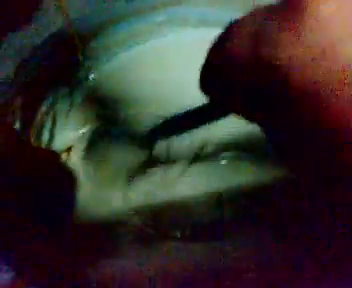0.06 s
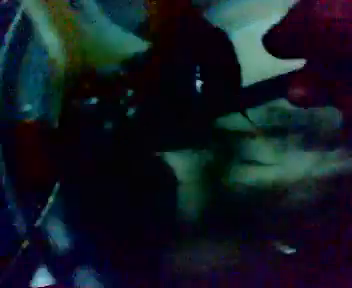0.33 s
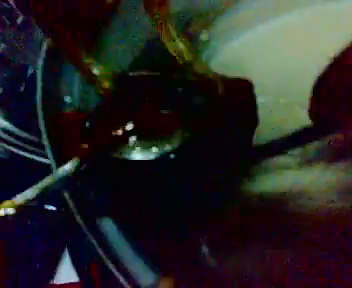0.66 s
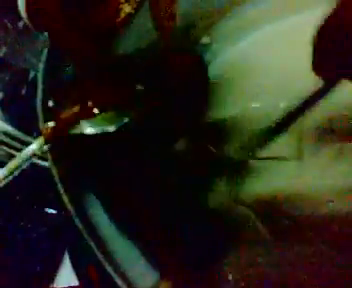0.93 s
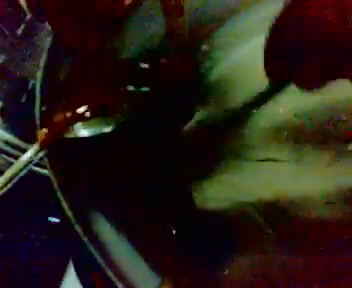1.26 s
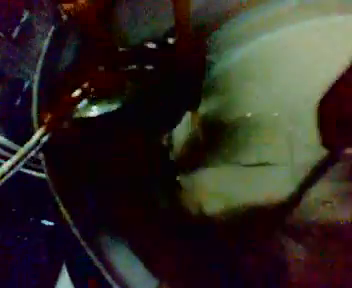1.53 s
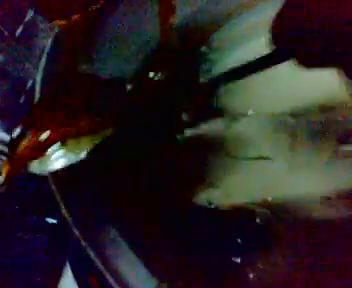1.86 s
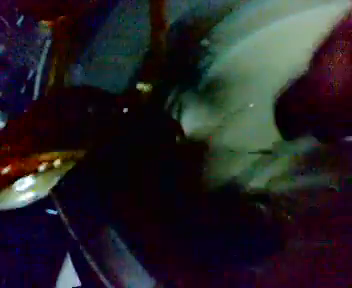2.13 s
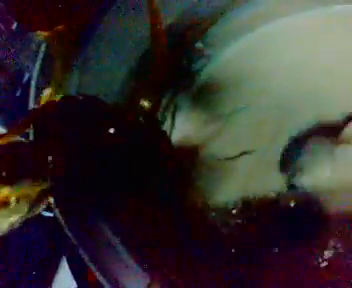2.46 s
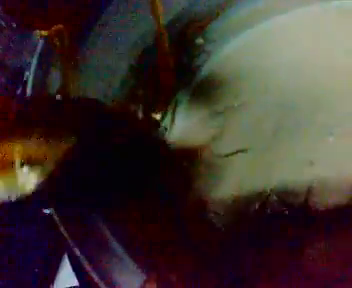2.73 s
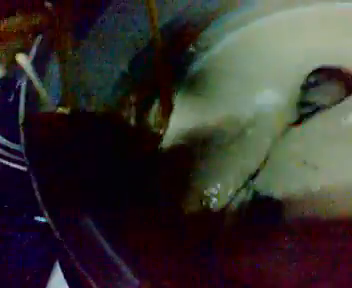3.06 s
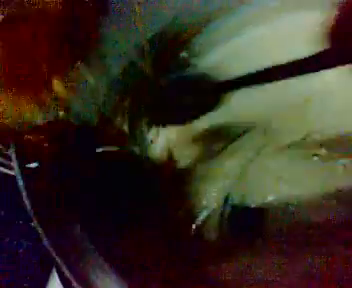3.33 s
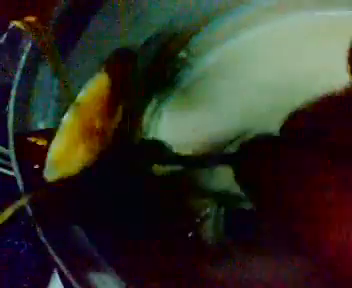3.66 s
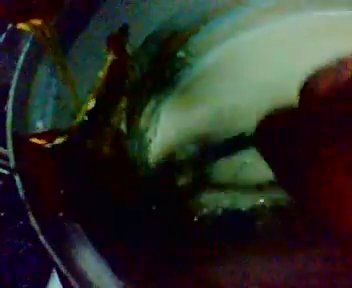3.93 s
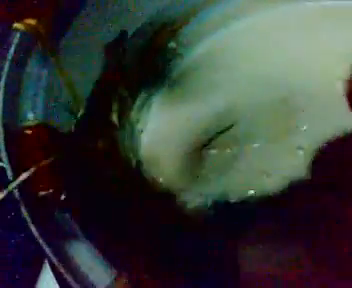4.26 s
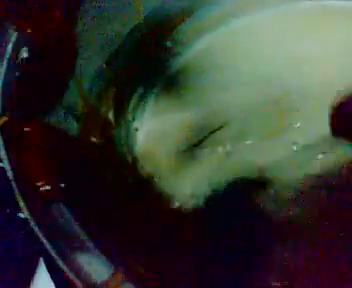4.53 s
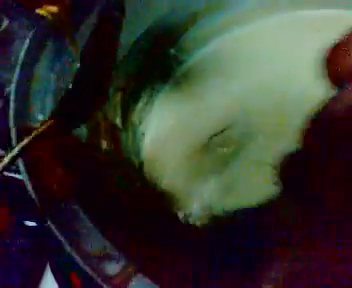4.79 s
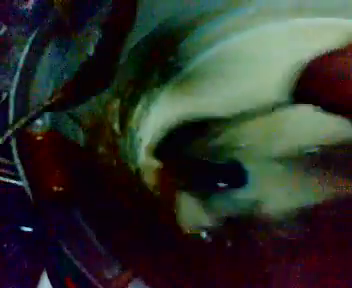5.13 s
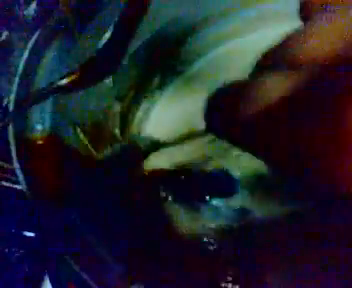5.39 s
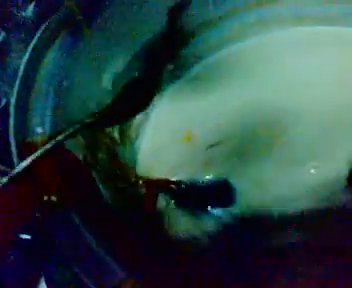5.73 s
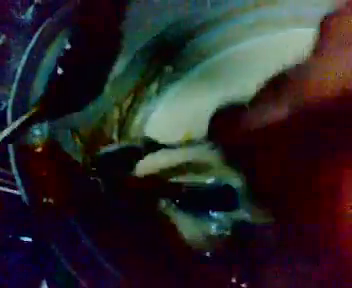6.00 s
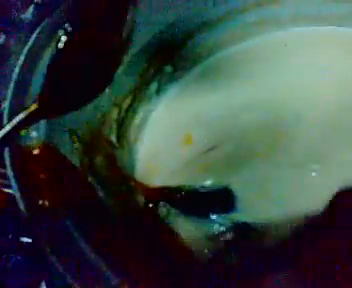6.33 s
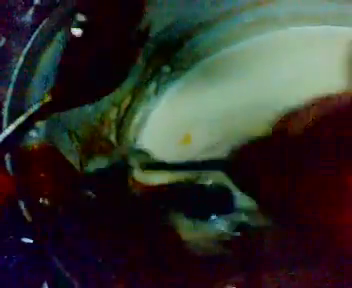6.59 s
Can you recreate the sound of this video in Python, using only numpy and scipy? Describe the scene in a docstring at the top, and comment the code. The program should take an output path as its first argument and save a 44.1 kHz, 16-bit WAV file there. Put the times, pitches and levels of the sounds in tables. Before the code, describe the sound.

A metal spoon stirs a thick mixture in a metal pot, with uneven scrapes and a few sharp clinks.

```python
"""A kitchen, close up: a metal spoon stirs a thick mixture in a metal pot.
Each turn starts with a knock on the pot, choked by the mixture, and goes on as a scrape:
a dull churn, a hum of the pot bottom, and a bright rasp where metal meets bare metal.
The mixture slops softly and the pot wall sings, over a bed of room air and low rumble.
A small microphone overloads on the hardest knock."""
import sys
import numpy as np
from scipy import signal
from scipy.fft import rfft, irfft
from scipy.io import wavfile
from scipy.ndimage import uniform_filter1d

SR = 44100
rng = np.random.default_rng(int(sys.argv[2]) if len(sys.argv) > 2 else 0)


def int16_out(signal):
    """Quantize to a 16-bit WAV file."""
    q = np.round(np.clip(np.atleast_2d(signal).T, -1, 1) * 32767)
    wavfile.write(sys.argv[1], SR, q.astype(np.int16))


N = 294147
TIME = np.arange(N) / SR


def amp(db):
    """Decibels to gain."""
    return 10 ** (np.asarray(db) / 20)


def unit(x):
    """Scales to rms 1."""
    return x / np.sqrt(np.mean(x ** 2) + 1e-20)


def unit_in(x, lo_hz, hi_hz):
    """Scales so that one band has rms 1."""
    bandpass = signal.butter(4, [lo_hz, hi_hz], "band", fs=SR, output="sos")
    return x / np.std(signal.sosfilt(bandpass, x))


def read(points, hz):
    """Reads a curve on a log-frequency axis."""
    f, value = np.transpose(points)
    return np.interp(np.log(hz + 1), np.log(f + 1), value)


def add(mix, s, sound):
    """Mixes a sound in at s seconds."""
    part = mix[max(round(s * SR), 0):][:len(sound)]
    part += sound[:len(part)]


def eq(x, points):
    """Minimum-phase EQ through points of f/Hz, level/dB."""
    log_gain = np.log(amp(read(points, abs(np.fft.fftfreq(4096, 1 / SR)))))
    taps = np.fft.ifft(np.exp(np.conj(signal.hilbert(log_gain)))).real
    return signal.oaconvolve(x, taps)[:len(x)]


def resonate(x, hz, width_hz):
    """A sweepable resonance of gain 1."""
    turn = np.exp(2j * np.pi * np.cumsum(hz * np.ones(len(x))) / SR)
    pole = np.exp(-np.pi * width_hz / SR)
    return 2 * (turn * signal.lfilter([1 - pole], [1, -pole], x / turn + 1e-18)).real


def wander(hz):
    """Random modulation of rms 1, up to about the given rate."""
    lowpass = np.exp(-(np.fft.rfftfreq(N, 1 / SR) / hz) ** 2)
    return unit(irfft(rfft(rng.standard_normal(N)) * lowpass, N))


def slips(per_s, spread_db, smooth):
    """Stick and slip: tiny jerks of uneven size over a smooth rub."""
    size = amp(spread_db * np.minimum(rng.exponential(1, N), 3)) * rng.choice([-1, 1], N)
    jerks = unit(size * (rng.random(N) < per_s / SR))
    return unit(jerks + smooth * rng.standard_normal(N))


def roam(x, depth_db, width_hz, hold_s):
    """As the contact point travels, it feeds some modes and starves others."""
    hz, t, spectrum = signal.stft(x, SR, nperseg=512)
    patches = rng.standard_normal(spectrum.shape)
    patches = uniform_filter1d(patches, max(round(width_hz / hz[1]), 1), axis=0)
    patches = uniform_filter1d(patches, max(round(hold_s / t[1]), 1), axis=1)
    gain = amp(depth_db * np.clip(unit(patches), -2, 2))
    return signal.istft(spectrum * gain, SR, nperseg=512)[1][:N]


def movement(swell_s, hold_s, release_s):
    """Pressure envelope: swells by 15 dB, holds, then falls 23 dB per release time."""
    t = np.arange(0, swell_s + hold_s + 3 * release_s, 1 / SR)
    bite = np.minimum(t / 0.006, 1)
    building = np.maximum(1 - t / swell_s, 0)
    letting_go = np.maximum(t - swell_s - hold_s, 0) / release_s
    return bite * amp(-15 * building - 23 * letting_go)


def ring(modes, t, detune):
    """Dying modes; their pitch shifts a little with the place of the blow."""
    out = np.zeros(len(t))
    for hz, db, t60 in modes:
        pitch_hz = hz * (1 + detune * rng.standard_normal())
        out += amp(db - 60 * t / t60) * np.sin(2 * np.pi * (pitch_hz * t + rng.random()))
    return out


def struck(x, t, rise_s):
    """Gives a ring its attack, and rms 1 over its first 15 ms."""
    x = x * (1 - np.exp(-(t / rise_s) ** 2))
    return x / np.sqrt(np.mean(x[t < .015] ** 2))


# EQ of the room air and of the rumble: f/Hz, level/dB
AIR_EQ = [(25, -7.5), (90, -9), (145, -7), (260, -11.5), (440, -7.5), (620, -12.5), (750, -7), (900, -16),
          (1040, -11), (2300, -20.5), (4300, -21), (5400, -13), (6200, -18), (7700, -23.5)]
RUMBLE_EQ = [(12, -17), (25, -3), (42, -8.5), (54, 2), (68, -6), (95, -15), (150, -18), (400, -51.5)]
# fader ride of the rumble: t/s, level/dB
RUMBLE_RIDE = [(0, -55), (.6, -56), (.9, -48.5), (1.3, -48.5), (1.7, -60), (2.2, -52), (3.3, -54.5),
               (4.0, -65.5), (4.5, -58), (5.1, -53), (5.5, -60), (6.67, -55)]


def room_tone():
    """The bed: steady air with microphone hiss, over a wavering rumble."""
    air = unit(eq(rng.standard_normal(N), AIR_EQ)) * amp(-49)
    low_shape = amp(read(RUMBLE_EQ, np.fft.rfftfreq(N, 1 / SR)))
    low_end = irfft(rfft(rng.standard_normal(N)) * low_shape, N)
    rumble = unit(low_end * amp(3 * wander(hz=6.8)))
    return air + rumble * amp(np.interp(TIME, *np.transpose(RUMBLE_RIDE)))


# reverb decay of the kitchen: f/Hz, t60/s
ROOM_DECAY = [(150, 0.4), (500, .38), (1200, 0.2), (2000, 0.34), (7500, 0.14)]


def kitchen_reverb(x, predelay_s):
    """Dense, warm small-room echoes, each band dying at its own speed."""
    size = SR // 2
    reflections = rng.standard_normal(size) * (rng.random(size) < 4000 / SR)
    hz, t, spectrum = signal.stft(reflections, SR, nperseg=256)
    tilt_db = read([(200, 6), (1200, 1.5), (3000, -1.5), (7500, -4)], hz)[:, None]
    decay_db = 60 * t / read(ROOM_DECAY, hz)[:, None]
    tail = signal.istft(spectrum * amp(tilt_db - decay_db), SR, nperseg=256)[1]
    tail *= np.clip(np.arange(len(tail)) / SR / predelay_s - 1, 0, 1)
    return signal.fftconvolve(x, tail / np.linalg.norm(tail))[:N]


# cues for the heaves of the mixture: t/s, swell/s, level/dB
HEAVE_CUES = [(0.575, .012, -50.5), (0.63, .02, -49), (0.72, .06, -53.5), (1.09, 0.014, -55),
              (2.10, 0.054, -49), (2.905, 0.0089, -49), (5.29, 0.031, -51), (5.36, 0.034, -53.5),
              (5.60, 0.055, -48.5), (5.70, 0.017, -46.5)]


def heaves():
    """The mixture folds over with a low, soft slop."""
    slop = eq(slips(per_s=180, spread_db=1.5, smooth=0.368),
              [(60, -33.5), (150, 1), (260, 0), (420, -2.5), (900, -23), (3000, -34)])
    gain = np.zeros(N)
    for s, swell_s, db in HEAVE_CUES:
        add(gain, s, amp(db) * movement(swell_s, hold_s=0.013, release_s=0.079))
    return unit_in(slop, 130, 400) * gain


# cues for the spoon's side brushing the wall: t/s, hold/s, level/dB
BRUSH_CUES = [(0.567, .22, -58.5), (1.172, .02, -52), (2.01, .17, -51.5), (2.447, 0.44, -60.5)]


def brushes():
    """Light, broken rubbing keeps the wall's main mode singing."""
    rub = slips(per_s=220, spread_db=4, smooth=.3) * amp(3 * wander(hz=40))
    sing = resonate(resonate(rub, 1915, width_hz=110), 1915, width_hz=500)
    gain = np.zeros(N)
    for s, hold_s, db in BRUSH_CUES:
        add(gain, s, amp(db) * movement(swell_s=.03, hold_s=hold_s, release_s=0.11))
    return unit(sing) * gain


# EQ of the churn: f/Hz, level/dB
CHURN_EQ = [(120, -45), (250, -22.5), (400, -7.5), (590, -1.5), (700, -3.5), (850, 2), (1150, -15.5),
            (1370, -4), (1700, -10.5), (2200, -10), (2850, -24.5), (3350, -21.5), (3800, -33.5),
            (7800, -35.5)]


def churn(judder):
    """The dull body of the scrape: the spoon drags through the mixture."""
    drag = eq(slips(per_s=650, spread_db=4, smooth=.45) * amp(2.2 * judder), CHURN_EQ)
    return unit_in(roam(drag, depth_db=5.5, width_hz=170, hold_s=0.053), 300, 1100)


def bottom_hum(judder, pressure):
    """The rubbed pot bottom hums, sagging in pitch as the spoon pushes harder through the mixture."""
    rub = slips(per_s=1200, spread_db=3.5, smooth=0.7) * amp(3.1 * judder)
    hum_hz = (1065 - 131 * pressure) * (1 + 0.031 * wander(hz=25))
    hum = resonate(resonate(rub, hum_hz, width_hz=93), hum_hz, width_hz=210)
    return unit_in(hum, 990, 1100)


# EQ of the rasp: f/Hz, level/dB
RASP_EQ = [(200, -21.5), (400, -4.5), (650, -9), (850, -13), (1400, 0.5), (2100, -10.5), (2500, -1),
           (2950, -3.5), (3400, 0), (3900, -9), (4600, -3.5), (5900, -1), (6700, -6.5), (7800, -12.5)]
# resonances that the rasp sets ringing: f/Hz, width/Hz, level/dB
RASP_PEAKS = [(380, 100, 8.5), (1450, 110, 2.5), (1896, 66, 11), (2610, 28, -10.5), (4440, 45, -16)]


def rasp(centre_hz):
    """The bright edge of the scrape: metal grinds on bare metal."""
    grit = eq(slips(per_s=1400, spread_db=3.5, smooth=.55) * amp(1.4 * wander(hz=120)), RASP_EQ)
    grit += sum(amp(db) * resonate(grit, hz, width) for hz, width, db in RASP_PEAKS)
    # the spoon's strongest resonance moves as it tilts
    grit += amp(10.5) * resonate(grit, centre_hz, width_hz=1200)
    return unit_in(roam(grit, depth_db=3.8, width_hz=260, hold_s=.07), 2500, 7500)


# cues for the pushes along the pot:
# t/s, swell/s, hold/s, release/s, churn level/dB, hum level/dB, rasp level/dB, rasp centre f/Hz
PUSH_CUES = [(0.847, 0.038, 0.13, .02, -38, -38.5, -53, 3300),
             (1.476, 0.027, 0.0056, 0.012, -47, -44, -41.5, 3650),
             (1.564, .01, 0.018, 0.1, -42, -39, -37.5, 4500),
             (1.649, .11, 0.048, .025, -39.5, -39, -50, 4200),
             (1.809, 0.022, 0.0085, .022, -30.5, -35, -39.5, 3950),
             (2.046, 0.036, 0.14, .05, -53, -61, -53.5, 4200),
             (2.193, 0.081, .02, 0.041, -41.5, -42, -34.5, 4550),
             (2.266, 0.027, 0.017, 0.064, -41.5, -31, -33, 5000),
             (2.327, 0.063, 0.034, 0.054, -45.5, -39.5, -50.5, 4750),
             (2.475, 0.028, 0.055, 0.064, -38.5, -39.5, -45.5, 4500),
             (3.016, 0.0091, .05, 0.035, -37, -41, -39, 4300),
             (3.061, 0.018, .008, 0.021, -27, -40, -38, 4750),
             (3.094, .015, 0.042, .07, -41.5, -46.5, -47.5, 4500),
             (4.428, 0.042, 0.024, 0.029, -50.5, -40, -35, 3300),
             (4.515, .05, 0.4, 0.055, -57, -66, -61.5, 4520),
             (4.938, .01, 0.071, 0.05, -50, -36.5, -37.5, 3850),
             (5.003, .03, .012, 0.067, -37.5, -34, -41, 4300),
             (5.069, 0.042, 0.03, 0.041, -32, -27.5, -44.5, 4700),
             (5.106, 0.036, 0.021, .035, -34, -29, -38, 4700),
             (5.595, 0.0092, 0.042, .04, -42.5, -44.5, -40.5, 3750),
             (5.69, 0.0091, 0.053, 0.077, -49.5, -48, -44.5, 3380),
             (5.782, .095, 0.029, 0.017, -42, -43.5, -34.5, 4100),
             (6.36, .04, 0.036, 0.098, -46.5, -39, -39.5, 3420),
             (6.444, 0.038, 0.029, 0.067, -39.5, -42, -27.5, 3550),
             (6.501, .03, .035, 0.059, -43.5, -40, -49.5, 3500)]


def scrapes():
    """The spoon judders along the pot, each push with its own blend of churn, hum and rasp."""
    churn_power, hum_power, rasp_power, weighted_hz = np.zeros((4, N))
    for s, swell_s, hold_s, release_s, churn_db, hum_db, rasp_db, rasp_hz in PUSH_CUES:
        power = movement(swell_s, hold_s, release_s) ** 2
        add(churn_power, s, power * amp(churn_db) ** 2)
        add(hum_power, s, power * amp(hum_db) ** 2)
        add(rasp_power, s, power * amp(rasp_db) ** 2)
        add(weighted_hz, s, power * amp(rasp_db) ** 2 * rasp_hz)
    # where pushes overlap, the loudest rasp pulls the centre its way
    active = rasp_power > 0
    centre_hz = np.interp(TIME, TIME[active], weighted_hz[active] / rasp_power[active])
    churn_gain, hum_gain, rasp_gain = np.sqrt([churn_power, hum_power, rasp_power])
    judder = wander(hz=100)
    return (churn(judder) * churn_gain
            + bottom_hum(judder, pressure=churn_gain / churn_gain.max()) * hum_gain
            + rasp(centre_hz) * rasp_gain)


# mode of the free pot wall: f/Hz, level/dB, t60/s
WALL_MODES = [(1898, 0, 0.091)]


def wall_pings():
    """The free wall above the mixture answers each knock with one short ping."""
    out, t = np.zeros(N), np.arange(SR // 6) / SR
    for s, _, _, ping_db, _, _ in KNOCK_CUES:
        # after a light tap the spoon stays on the wall and damps it
        damping = np.exp(-t * 3 * max(-ping_db - 30, 0))
        ping = ring(WALL_MODES, t, detune=0) * damping
        add(out, s, amp(ping_db) * struck(ping, t, rise_s=0.0017))
    return out


# modes of the whole filled pot, its bottom and the spoon: f/Hz, level/dB, t60/s
BODY_MODES = [(163, -14, 0.12), (397, -2.5, 0.095), (525, -5.5, 0.053), (645, 1, 0.046)]
BOTTOM_MODES = [(807, -19.5, 0.11), (974, 2, 0.025), (1062, -3.5, 0.049), (1407, -7, 0.052),
                (1452, -13.5, 0.0748), (1608, -17, 0.077)]
SPOON_MODES = [(2336, 1, 0.025), (2756, -1.5, 0.027), (3222, -1, 0.031), (3304, -4, 0.0083),
               (4600, -25, .013), (4590, 2.5, .012), (5390, 6.5, 0.014), (5825, 2, 0.017),
               (6800, -15.5, 0.0093), (7600, -20.5, .01)]
# cues for the knocks and catches of the spoon:
# t/s, thud level/dB, clonk level/dB, wall ping level/dB, clink level/dB, clink centre f/Hz
KNOCK_CUES = [(0.5742, -44.5, -58, -55, -60, 4460), (0.674, -39, -36, -49, -37.5, 2280),
              (0.77, -52, -49.5, -41, -43, 3570), (0.9114, -52, -40, -44, -47, 2930),
              (1.3452, -53.5, -49.5, -51, -43, 3370), (1.7537, -52, -42, -54, -47.5, 3750),
              (1.8065, -54, -39, -41, -56, 3240), (2.099, -45.5, -44.5, -39, -46.5, 3230),
              (2.144, -45, -45, -53, -52, 3540), (2.1839, -42, -44.5, -41, -34.5, 3800),
              (2.2504, -47, -41.5, -49, -38, 4350), (2.502, -48.5, -48, -52, -62, 4300),
              (2.7037, -63, -52, -65, -41, 5070), (3.0019, -26.5, -14, -20.5, -14, 4240),
              (4.41, -55, -51, -53, -46.5, 3230), (4.9437, -31, -23, -40.5, -19, 4730),
              (5.5687, -33.5, -27, -19, -21.5, 3760), (6.309, -33, -26.5, -37.5, -25, 3530)]


def knocks():
    """The spoon hits the pot: its body thuds, the bottom clonks, the spoon clinks."""
    out, t = np.zeros(N), np.arange(SR // 4) / SR
    for s, thud_db, clonk_db, _, clink_db, clink_hz in KNOCK_CUES:
        # the transient: the spoon chatters for a few milliseconds as it lands
        chatter = rng.standard_normal(len(t)) * np.exp(-(t / 0.0032) ** 0.67)
        punch = eq(chatter, [(20, -3.5), (50, -1.5), (100, -6.5), (250, -7), (420, 9),
                             (700, -9.5), (1500, -35)])
        thud = unit(ring(BODY_MODES, t, detune=0.00445)) + 0.56 * unit(punch)
        clack = eq(chatter, [(300, -21.5), (700, 7), (1500, 8), (2300, -2), (4000, -16.5)])
        clonk = unit(ring(BOTTOM_MODES, t, detune=0.0066)) + 0.32 * unit(clack)
        crack = eq(chatter, [(900, -26), (2300, 4), (5500, -1), (7800, -1.5)])
        clink = unit(ring(SPOON_MODES, t, detune=0.019)) + 0.86 * unit(crack)
        # the place and hardness of the contact favour one region of the spoon's modes
        clink = eq(clink, [(clink_hz / 2, -9), (clink_hz / 1.26, 0), (clink_hz * 1.07, 0),
                           (clink_hz * 1.98, -10), (clink_hz * 3, -18)])
        clink += amp(-9.5) * resonate(clink, clink_hz, width_hz=770)
        # light taps stay in the mixture, which chokes them sooner
        choke = np.exp(-t * 12 * max(-clink_db - 29, 0))
        add(out, s, amp(thud_db) * struck(thud * choke, t, rise_s=0.0024))
        add(out, s, amp(clonk_db) * struck(clonk * choke, t, rise_s=0.0018))
        add(out, s, amp(clink_db) * struck(clink * choke, t, rise_s=0.00084))
    return out


def scene():
    """Mono mix: knocks and stirring feed the reverb; the wall's ping stays dry, so it dies quickly."""
    hits = knocks()
    stirring = scrapes() + brushes() + heaves()
    reverb = kitchen_reverb(amp(-14.5) * hits + amp(-14) * stirring, predelay_s=0.0021)
    return (hits + wall_pings() + stirring + reverb + room_tone())[None]


def high_cut(x, hz, taps, beta):
    """Linear-phase low-pass."""
    kernel = signal.firwin(taps, hz, window=("kaiser", beta), fs=SR)
    return signal.oaconvolve(x, kernel[None], "same")


def record(dry):
    """A narrow-band microphone soft-clips on the hardest knock; two high cuts round off the edge."""
    narrow = high_cut(dry, hz=7680, taps=301, beta=8)
    ceiling = .72
    clipped = narrow / (1 + (narrow / ceiling) ** 8) ** (1 / 8)
    softened = high_cut(clipped, hz=10200, taps=31, beta=6)
    return high_cut(softened, hz=12000, taps=255, beta=9)


dry = scene()
out = record(dry)
int16_out(out)
```